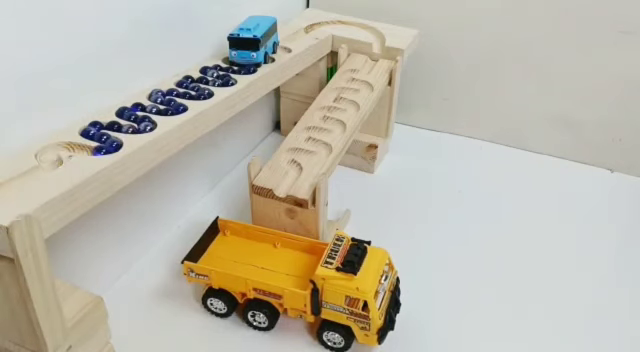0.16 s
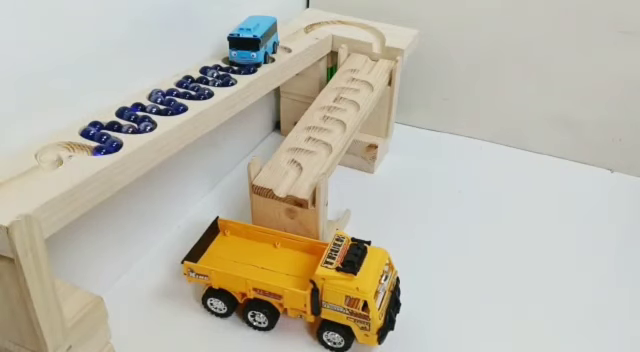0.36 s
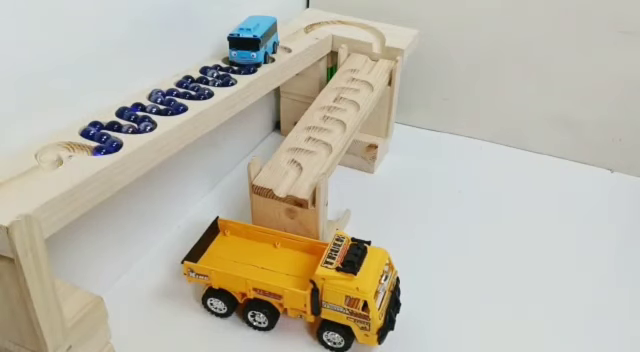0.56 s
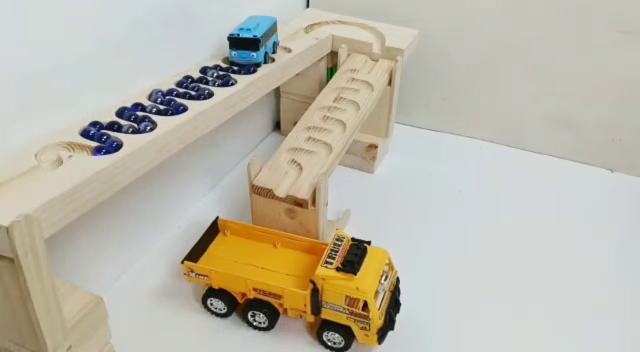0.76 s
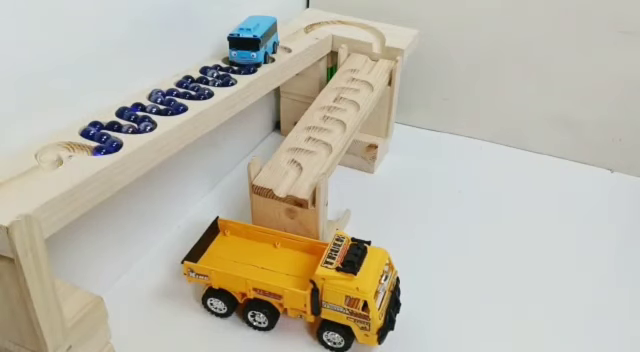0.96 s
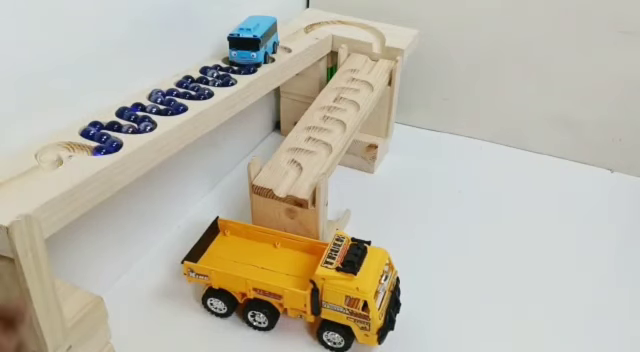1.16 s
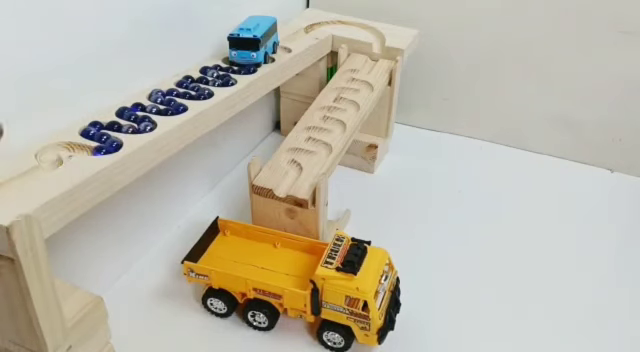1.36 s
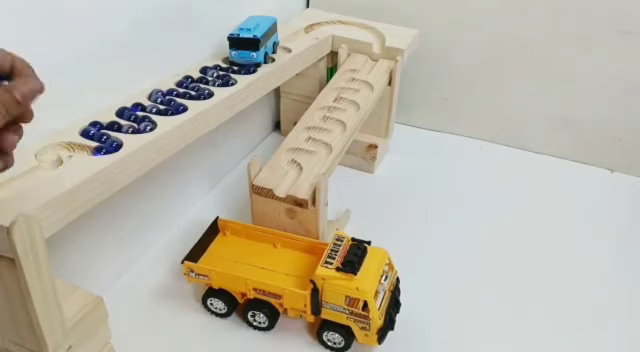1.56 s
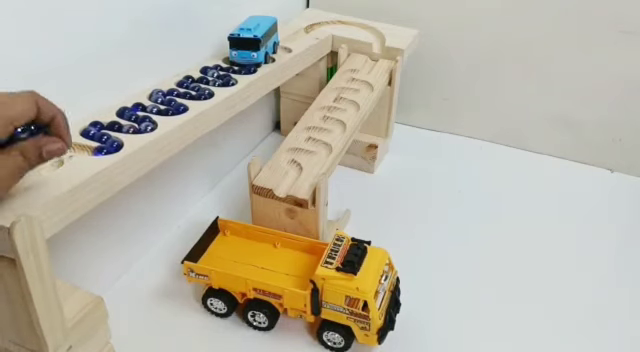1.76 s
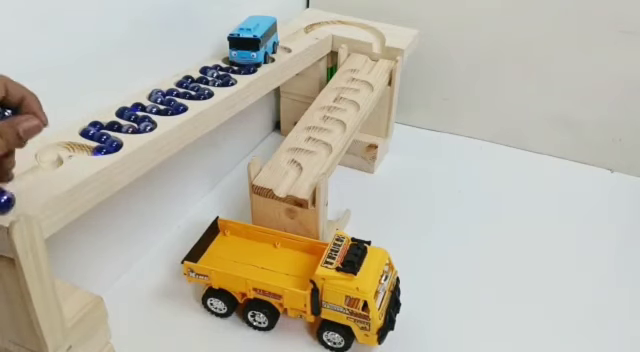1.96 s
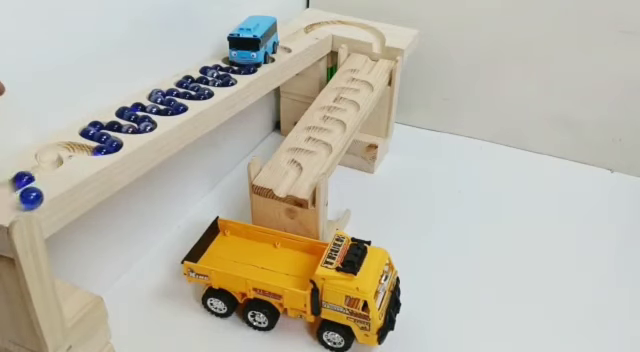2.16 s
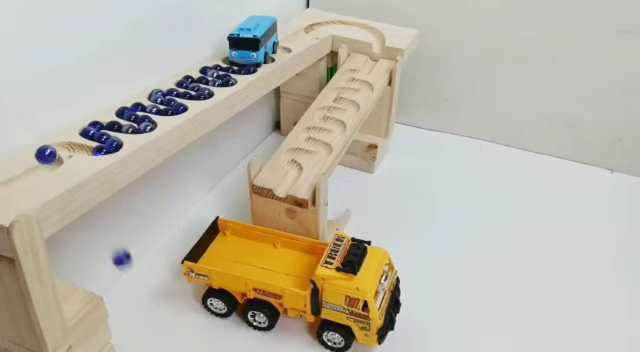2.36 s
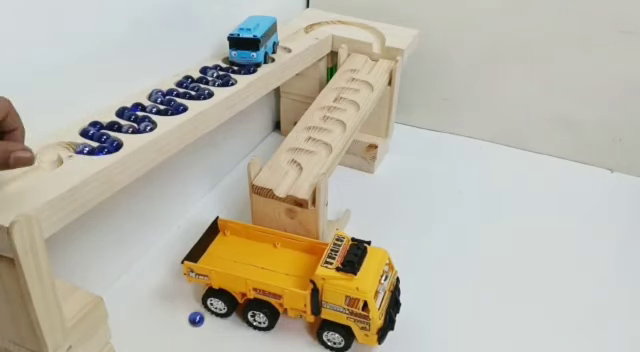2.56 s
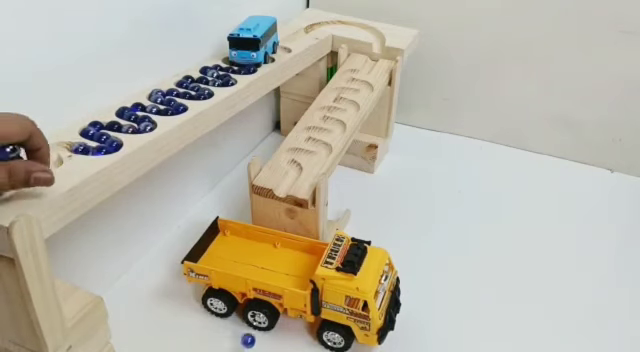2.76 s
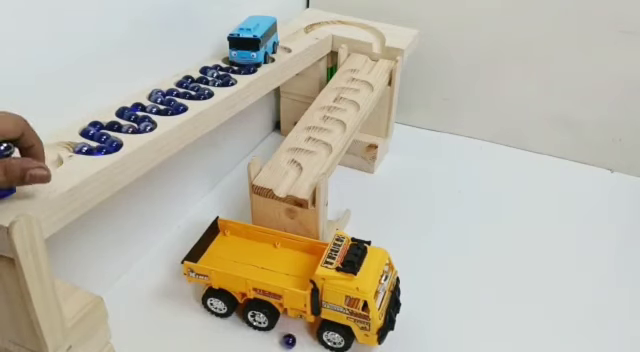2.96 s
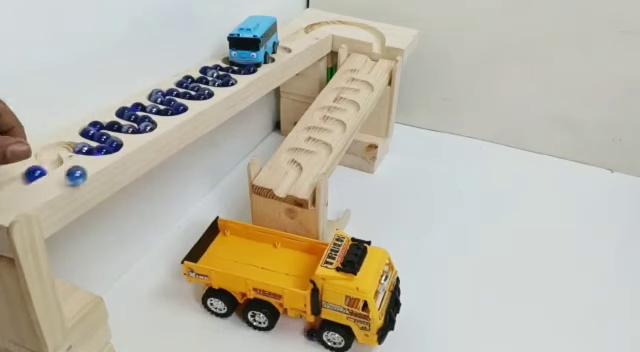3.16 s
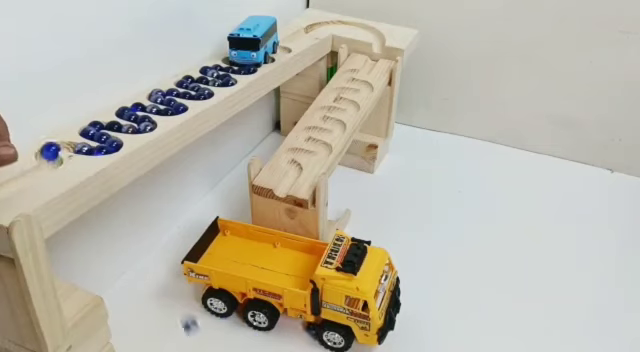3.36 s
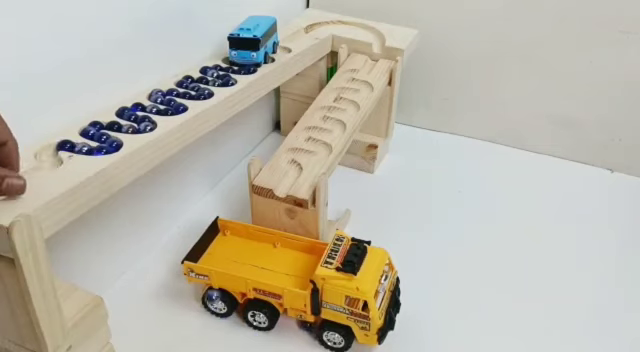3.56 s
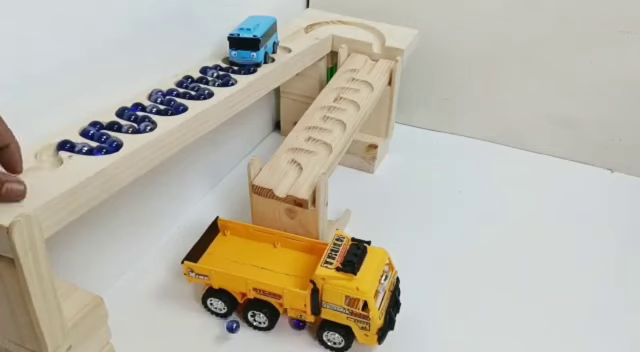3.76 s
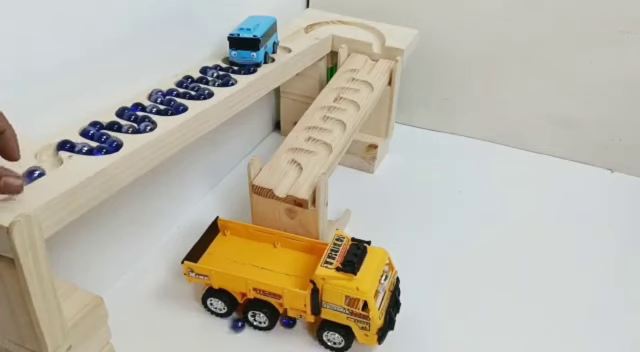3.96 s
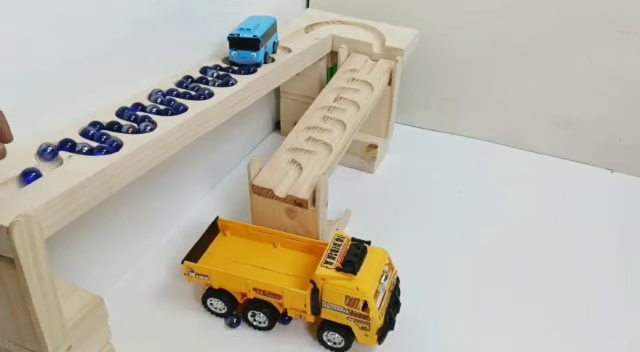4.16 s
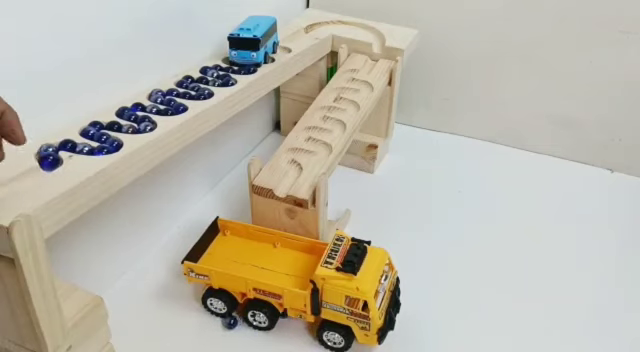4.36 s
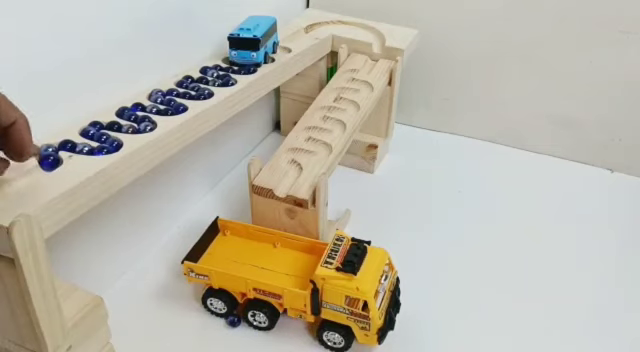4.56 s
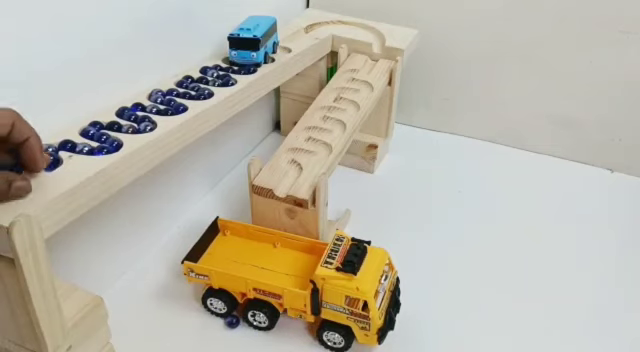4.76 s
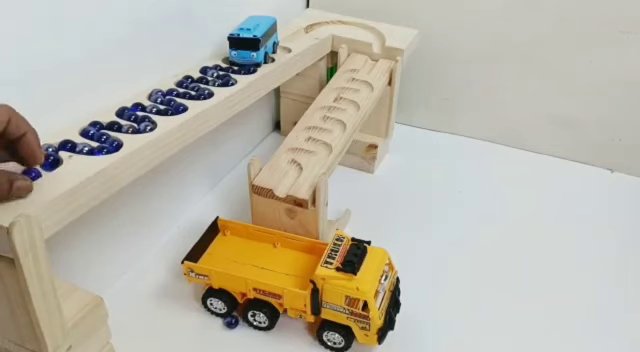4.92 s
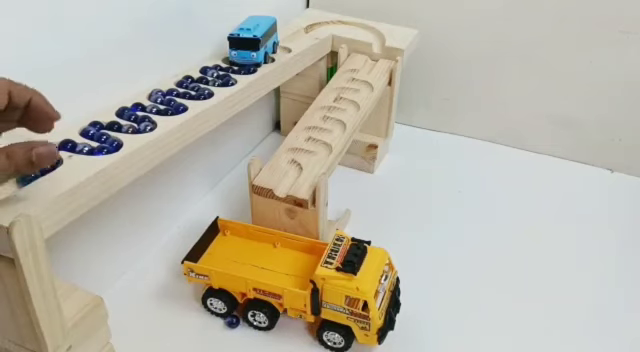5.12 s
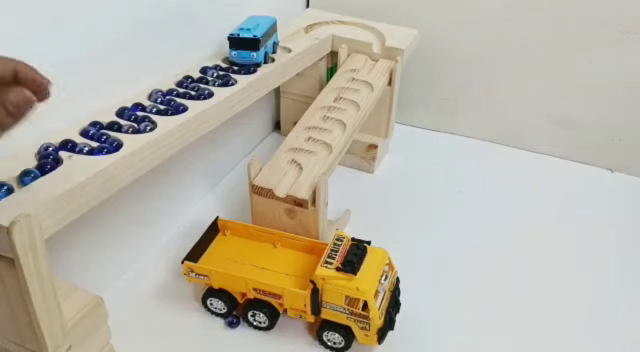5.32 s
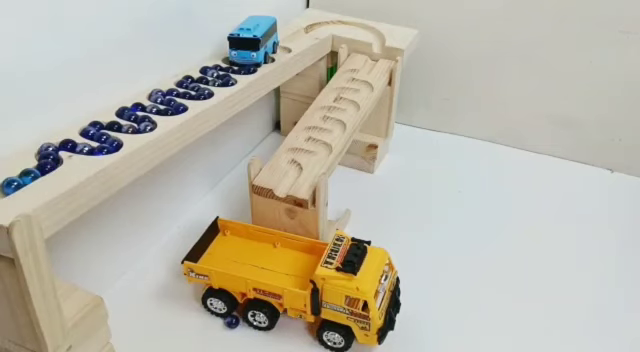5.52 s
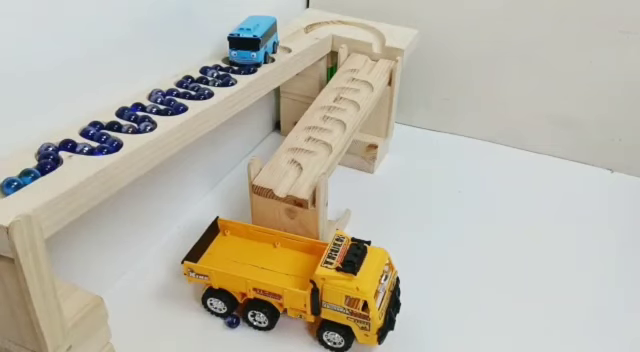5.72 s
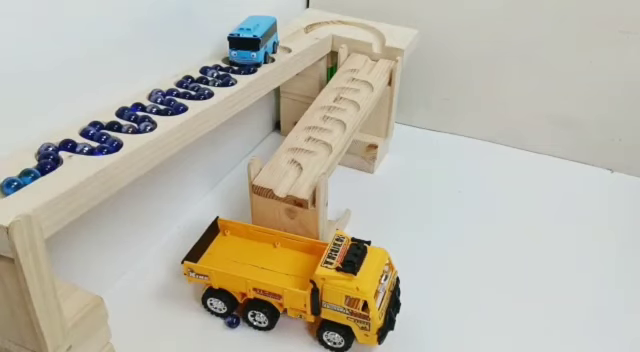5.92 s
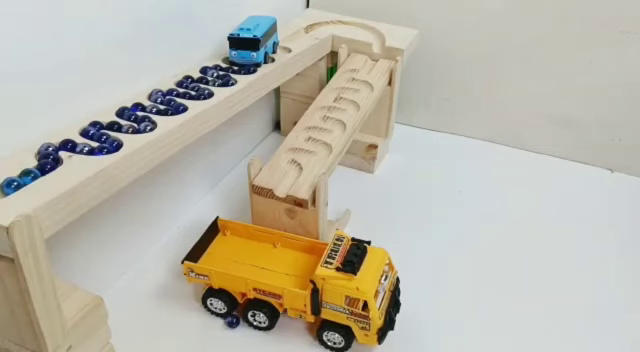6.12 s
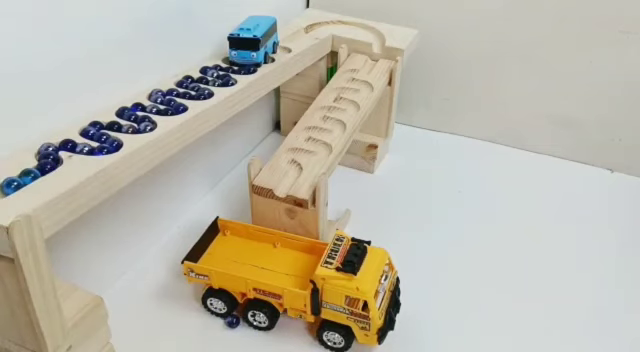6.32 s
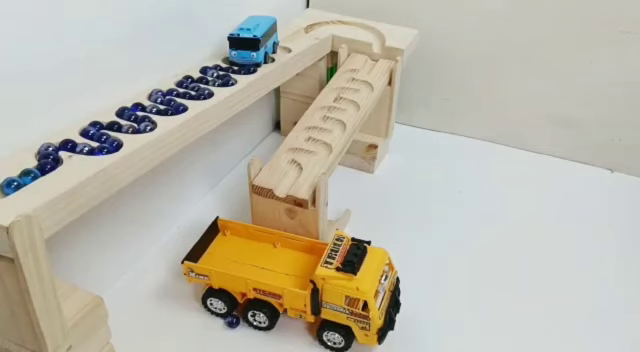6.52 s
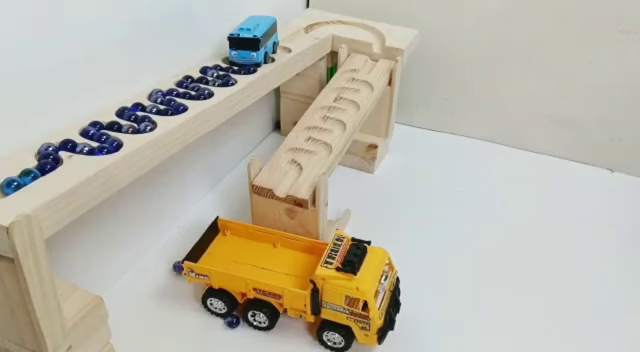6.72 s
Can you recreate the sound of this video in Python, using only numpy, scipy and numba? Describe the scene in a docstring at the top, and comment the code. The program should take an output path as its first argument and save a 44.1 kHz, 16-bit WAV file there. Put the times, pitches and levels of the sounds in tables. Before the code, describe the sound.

A faint wooden ring dies away in a bare, echoing room with soft air murmur. From about 0.3 to 1.5 s a hand stirs glass marbles in a bowl: irregular crunchy rattles, hard clacks near 0.7 s, high glassy pings around 1.1 s. A low boom at 1.8 s leads to clustered woody knocks at 2.0-2.1 s. At 2.7 s a marble hits the hard floor sharply and bounces in quickening, duller clicks. Knocks at 2.9-3.3 s end in a short groove rattle; a second marble drops at 3.65 s and bounces likewise. Knocks return at 3.95 s, a strong one at 4.2 s with chatter and glass clicks. A deep bump thuds at 4.8 s. Softer knocks and bright clinks run from 5.0 to 5.6 s. After a lull, marbles slide softly at 6.1 s, then rattle and clack at 6.4-6.8 s.

```python
"""In a bare, echoing room a plank's ring decays while a hand stirs glass marbles in a bowl: collision noise
excites wandering resonances. From 2 s knocks of glass sound on a wooden track, as contacts exciting plank
modes; marbles rattle along its groove or click together. Near 2.7 s and 3.6 s two fall and bounce on the
hard floor, as sharp pulses with diffuse echoes. From 6.1 s the hand stirs the bowl again.
Dull bumps, a low rumble and a room boom (filtered noise) accompany the handling; air murmurs throughout."""
import sys
import numpy as np
from scipy import signal
from scipy.fft import rfft, irfft
from scipy.io import wavfile
from scipy.ndimage import uniform_filter1d
from numba import njit

SR = 44100
rng = np.random.default_rng(int(sys.argv[2]) if len(sys.argv) > 2 else 0)


def store_wav(level_fs):
    """Save 16-bit WAV to argv[1]."""
    pcm = np.round(np.clip(np.atleast_2d(level_fs), -1, 1) * 32767)
    wavfile.write(sys.argv[1], SR, pcm.T.astype(np.int16))


N = 299439
TIME = np.arange(N) / SR   # s
BURST, ATTACK = 4096, 220   # length of a burst and of its first 5 ms (samples)
CUTOFF_HZ = 15800   # top of the whole sound
# random level changes: scale (dB) and changes a second
CLUMP_DB, CLUMPS_PER_S = 1.8, 90


def from_db(db):
    """Logarithmic level: decibels to amplitude gain."""
    return 10 ** (np.asarray(db) / 20)


def rms_one(x):
    """Normalisation: scale to an rms of 1."""
    return x / np.sqrt(np.mean(x ** 2) + 1e-20)


def in_time(rows):
    """Linear interpolation: the columns of a curve, sample by sample."""
    s, *columns = np.transpose(rows)
    return [np.interp(TIME, s, c) for c in columns]


def at_hz(points, hz):
    """Logarithmic frequency axis: read a curve at the given frequencies."""
    f, value = np.transpose(points)
    return np.interp(np.log(np.maximum(hz, 1)), np.log(f), value)


def cut(x, hz, kind, order=2):
    """Butterworth filtering: a maximally flat pass band."""
    sections = signal.butter(order, np.minimum(hz, SR / 2 - 100), kind, fs=SR, output="sos")
    return signal.sosfilt(sections, x + 1e-18)


def resonate(x, hz, width_hz):
    """Damped resonance: a pole pair whose radius sets the bandwidth, gain 1 on top."""
    r = np.exp(-np.pi * width_hz / SR)
    zeros = np.array([1, 0, -1]) * (1 - r * r) / 2
    poles = [1, -2 * r * np.cos(2 * np.pi * hz / SR), r * r]
    return signal.lfilter(zeros, poles, x + 1e-18)


@njit
def moving_resonance(x, hz, width_hz):
    """Time-varying resonance: a decaying phasor whose pitch and width change from sample to sample."""
    out, state = np.zeros(len(x)), 0j
    for i in range(len(x)):
        state = state * np.exp(np.pi * (2j * hz[i] - width_hz[i]) / SR) + x[i] + 1e-18
        out[i] = state.real
    return out


def drift(per_s, size):
    """Slow random modulation: straight lines between normal values drawn this often."""
    step = SR / per_s
    return np.interp(np.arange(size) / step, np.arange(size), rng.standard_normal(size))


def body(x, modes, spread_db):
    """Modal superposition: every contact excites each resonance with a strength of its own."""
    out = 0
    for k, (hz, width, db) in enumerate(modes):
        struck = x * from_db(db + spread_db * rng.standard_normal(len(x)))
        out = out + (-1) ** k * resonate(struck, hz, width)
    return out


# wandering of a resonance: scale (Hz) and changes a second
WAVER_HZ, WAVER_PER_S = 40, 18


def wavering_body(x, modes, spread_db):
    """Modal superposition with wandering modes: each resonance drifts in pitch as the marbles shift."""
    out = 0
    for hz, width, db in modes:
        struck = x * from_db(db + spread_db * rng.standard_normal(N))
        pitch = hz + WAVER_HZ * drift(WAVER_PER_S, N)
        out = out + 2 * np.pi * width / SR * moving_resonance(struck, pitch, np.full(N, width))
    return out


def pulse(spectrum):
    """Minimum phase: folding the cepstrum gives the most compact causal pulse with this spectrum."""
    cepstrum = irfft(np.log(from_db(at_hz(spectrum, np.fft.rfftfreq(BURST, 1 / SR)))))
    cepstrum[1:BURST // 2] *= 2
    cepstrum[BURST // 2:] = 0
    return irfft(np.exp(rfft(cepstrum)))


def contact(scatter, t60):
    """Impulsive excitation: a click with a decaying noise spray of chatter and near reflections."""
    spray = rng.standard_normal(BURST) * from_db(-60 * np.arange(BURST) / SR / t60)
    return signal.unit_impulse(BURST) + scatter * spray / np.linalg.norm(spray)


def add(out, s, burst, db):
    """Superposition: mix in a burst whose first 5 ms have this rms level."""
    at = int(s * SR)
    out[at:at + BURST] += (burst * from_db(db) / np.sqrt(np.mean(burst[:ATTACK] ** 2)))[:N - at]


def steady(x, window_s):
    """Level equalisation: divide a random sound by its running rms."""
    power = np.abs(uniform_filter1d(x * x, int(window_s * SR)))
    return x / np.sqrt(power + 1e-3 * np.mean(x * x))


def stereo(mid, side, width):
    """Mid-side principle: left and right from a shared and an opposed part."""
    return mid + width * side * np.array([[1], [-1]])


def collisions(per_s, spread_db):
    """Poisson-like process: impulses at random moments, of random size and sign."""
    sizes = from_db(spread_db * np.minimum(rng.exponential(1, N), 3)) * rng.choice([-1, 1], N)
    return sizes * (rng.random(N) < per_s / SR)


def gesture(start, end, attack_s, release_db_per_s, arch_db):
    """Amplitude envelope: linear onset, sine arch in decibels (half of arch_db below 0 at its top), decay."""
    arch = np.sin(np.pi * np.clip((TIME - start) / (end - start), 0, 1))
    onset = np.clip((TIME - start) / attack_s, 0, 1)
    return onset * from_db(arch_db * (arch - 1.5) - release_db_per_s * np.maximum(TIME - end, 0))


# air spectrum: [f/Hz, relative level/dB per Hz]
AIR_SPECTRUM = [(110, -10.5), (404, -7.5), (1050, -7), (1270, -3.5), (1750, -6), (3370, -16), (3800, -29),
                (8610, -25), (16000, -42)]
# air level: [t/s, level/dB]
AIR_LEVEL = [(0, -42), (0.3, -51), (1.9, -45.5), (4.8, -44), (6.79, -49)]


def background():
    """Spectral shaping of noise: white noise becomes the steady murmur of air in the room."""
    white = stereo(*rng.standard_normal((2, N)), width=0.47)
    hiss = irfft(rfft(white) * from_db(at_hz(AIR_SPECTRUM, np.fft.rfftfreq(N, 1 / SR))), N)
    return rms_one(cut(hiss, 82, "high")) * from_db(in_time(AIR_LEVEL)[0])


# reverberation time of the room: [f/Hz, t60/s]
ROOM_T60 = [(150, 1.44), (700, 0.7), (1500, 0.92), (3000, 1.06), (5500, 0.68), (9000, 0.66), (13000, 0.32)]


def room(x, build_s, hold_s, width, treble_db):
    """Diffuse reverberation: dense echoes build up, hold, then decay exponentially band by band."""
    t, edges, tail = TIME[:int(SR * 3 / 2)], np.geomspace(100, 17000, 25), 0
    hz = np.fft.rfftfreq(len(t), 1 / SR)
    white = rfft(stereo(*rng.standard_normal((2, len(t))), width))
    for low, high in zip(edges, edges[1:]):
        centre = np.sqrt(low * high)
        band = irfft(white * ((hz >= low) & (hz < high)), len(t))
        band = band * from_db(CLUMP_DB * drift(CLUMPS_PER_S, len(t)))
        decay_db = 60 * np.maximum(t - hold_s, 0) / at_hz(ROOM_T60, centre)
        tail = tail + band * from_db(treble_db * centre / CUTOFF_HZ - decay_db)
    tail = tail * (1 - np.exp(-t / build_s)) / np.sqrt(SR / 10)
    return signal.fftconvolve(x[None], tail, axes=1)[:, :N]


# resonances of the wooden track: [f/Hz, width/Hz, level/dB]
TRACK = [(424, 39, -11), (836, 150, -11), (1311, 57, 5), (1753, 55, 6), (2160, 130, -9.5), (2680, 250, -7),
         (3390, 290, -9.5), (4280, 1400, -17)]
# ring of an earlier knock: level (dB) and fading (dB a second)
OPENING_RING_DB, OPENING_FADE_DB_PER_S = -40.5, 26


def opening_ring():
    """Exponential decay: noise through the plank's modes, the echo of an earlier knock dying away."""
    ring = cut(body(rng.standard_normal(N), TRACK, spread_db=1.5), 4000, "low", order=4)
    return rms_one(ring) * from_db(OPENING_RING_DB - OPENING_FADE_DB_PER_S * TIME)


# the hand presses and shifts things: [start t/s, end t/s, rumble level/dB, boom level/dB], before the envelope
HANDLING = [(-0.1, 0.33, -43, -42.5), (1.71, 1.856, -47.5, -33.5), (2.252, 2.575, -54, -35.5),
            (3.116, 3.7, -45.5, -37.5), (3.724, 4.178, -43, -62), (4.57, 4.983, -33, -33),
            (4.982, 5.305, -43, -49), (5.714, 6.784, -54.5, -44)]
HANDLING_ATTACK_S, HANDLING_ARCH_DB = 0.085, 4
RUMBLE_RELEASE_DB_PER_S, BOOM_RELEASE_DB_PER_S = 34, 31.5
# what is left of both while the hand rests
RESTING_RUMBLE_DB, RESTING_BOOM_DB = -78, -60
# dull bumps: [t/s, peak level of the envelope/dB, f/Hz]
BUMPS = [(1.793, -28, 170), (3.361, -24, 97), (3.797, -27.5, 84), (3.807, -32.5, 258), (3.878, -28, 74),
         (4.769, -13.5, 115), (4.806, -17.5, 98), (4.877, -27, 115), (6.442, -32, 130)]


def handling():
    """Low-frequency excitation: noise drives a rumble and one room resonance; bumps are short sine pulses."""
    gains = from_db([[RESTING_RUMBLE_DB], [RESTING_BOOM_DB]])
    releases = np.array([[RUMBLE_RELEASE_DB_PER_S], [BOOM_RELEASE_DB_PER_S]])
    for start, end, rumble_db, boom_db in HANDLING:
        press = gesture(start, end, HANDLING_ATTACK_S, releases, HANDLING_ARCH_DB)
        gains = np.maximum(gains, from_db([[rumble_db], [boom_db]]) * press)
    rumble_gain, boom_gain = gains
    white = stereo(*rng.standard_normal((2, N)), width=0.4)
    low_noise = cut(cut(white, 92, "high", order=3), 93, "low", order=3)
    rumble = steady(low_noise, window_s=0.11) * rumble_gain
    room_mode = resonate(resonate(white, 151.0, 15.0), 153.4, 8.8)
    boom = steady(room_mode, window_s=0.068) * boom_gain
    bumps = np.zeros(N)
    for s, db, hz in BUMPS:
        age = np.maximum(TIME - s, 0)
        swell = age / 0.006   # the envelope peaks after 6 ms
        bumps += from_db(db) * swell ** 2 * np.exp(2 - 2 * swell) * np.sin(2 * np.pi * hz * age)
    return rumble + boom + bumps


def bounce_times(s, first_s, shrink, count):
    """Inelastic rebound: each flight lasts a fixed share of the one before."""
    return s + np.append(0, np.cumsum(first_s * shrink ** np.arange(count - 1)))


# falling marbles: [t/s, level/dB, first flight/s, share of speed kept at a bounce, lower lingering ring lift/dB]
FALLS = [(2.6981, -13, .2561, .464, -19), (3.6411, -10.5, .268, .427, -1)]
# successive floor contacts: [level relative to the fall/dB]
FLOOR_CONTACT_DB = [-0.5, 0.5, -1.5, -9.5]
# glass on hard floor: [f/Hz, relative level/dB per Hz]
CLACK_COLOUR = [(280, -32.5), (420, -3.5), (620, -12.5), (900, -3.5), (2400, 3), (4200, -1.5), (6200, -13),
                (8300, -3.5), (10000, -7.5), (12500, -22), (15500, -8)]
# treble lift and room share of the first contact, and what each later one loses; the mix scales the room share
CLACK_TREBLE_DB, DULLER_PER_BOUNCE_DB = 7.5, 13.5
CLACK_ROOM_DB, DRIER_PER_BOUNCE_DB = -1.45, 3


def floor_clacks():
    """Hard impact: one sharp pulse a bounce, ever duller and drier; returns direct sound and room feed."""
    direct, sent = np.zeros(N), np.zeros(N)
    plain = pulse(CLACK_COLOUR)
    treble = cut(plain, 3200, "high", order=1)
    for landing, fall_db, flight_s, kept, _ in FALLS:
        for k, s in enumerate(bounce_times(landing, flight_s, kept, count=len(FLOOR_CONTACT_DB))):
            db = fall_db + FLOOR_CONTACT_DB[k]
            clack = plain + (from_db(CLACK_TREBLE_DB - DULLER_PER_BOUNCE_DB * k) - 1) * treble
            scattered = signal.fftconvolve(contact(scatter=0.85, t60=0.034), clack)[:BURST]
            add(direct, s, scattered, db)
            add(sent, s, clack, db + CLACK_ROOM_DB - DRIER_PER_BOUNCE_DB * k)
    return direct, sent


# two rings after each fall: level relative to the fall (dB), t60 (s), filter width (Hz), pitches (Hz)
LINGER_DB, LINGER_T60_S, LINGER_WIDTH_HZ, LINGER_HZ = -19, 1.18, 1100, (2650, 4400)


def lingering_ring(build_s=0.023):
    """Frequency-selective reverberation: two fluttering noise bands linger after each fall."""
    out = np.zeros((2, N))
    for landing, db, _, _, lift_db in FALLS:
        age = np.maximum(TIME - landing, 0)
        white = stereo(*rng.standard_normal((2, N)), width=0.32)
        for hz, ring_db in zip(LINGER_HZ, (LINGER_DB + lift_db, LINGER_DB)):
            band = rms_one(resonate(resonate(white, hz, LINGER_WIDTH_HZ), hz, 2 * LINGER_WIDTH_HZ))
            flutter_db = CLUMP_DB * drift(CLUMPS_PER_S, N)
            build = 1 - np.exp(-age / build_s)
            out += band * build * from_db(db + ring_db + flutter_db - 60 * age / LINGER_T60_S)
    return out


# envelope shared by groove rolls and stirring
STIR_ATTACK_S, STIR_RELEASE_DB_PER_S, STIR_ARCH_DB = 0.0034, 296, 3.5
# rattling along the groove: [start t/s, end t/s, level before the envelope/dB, top f/Hz]
ROLLS = [(3.266, 3.375, -28, 2470), (4.235, 4.326, -27.5, 5350)]


def groove_rolls():
    """Repeated impact: a marble chatters against the groove's sides in quick, uneven, dry ticks."""
    out = np.zeros(N)
    ticks = cut(collisions(per_s=880, spread_db=-1.5), 1060, "high")
    ticks = cut(ticks, 2600, "low", order=1)
    for start, end, db, top_hz in ROLLS:
        rattle = steady(cut(ticks, top_hz, "low", order=8), window_s=0.04)
        out += from_db(db) * rattle * gesture(start, end, STIR_ATTACK_S, STIR_RELEASE_DB_PER_S, STIR_ARCH_DB)
    return out


# marble against marble: [t/s, level/dB, f/Hz, delay of second click/s, second click relative level/dB]
CLINKS = [(0.193, -28, 8200, 0.06, -5), (3.247, -44.5, 10800, 0.0084, 5.5), (4.351, -36, 7950, 0.017, -7),
          (4.496, -30.5, 7770, 0.026, 4), (5.2221, -33, 7700, 0.027, 5), (5.314, -23.5, 7430, 0.018, -3),
          (5.587, -30, 7770, 0.042, 0)]


def marble_clinks():
    """Momentum transfer: a blow is passed on, so two short contacts each give a bright, grainy chatter."""
    out = np.zeros(N)
    for first, first_db, hz, gap_s, second_db in CLINKS:
        for s, db in ((first, first_db), (first + gap_s, first_db + second_db)):
            hit = contact(scatter=2.8, t60=0.26)
            click = resonate(hit, hz, 1150) + from_db(-35) * cut(hit, 1100, "high")
            add(out, s, click, db)
    return out


# knocks on the track; the one at 2.068 s is a late repeat of the one at 2.058 s:
# [t/s, level before the mix/dB, top of contact spectrum f/Hz, lift of the outer resonances/dB]
KNOCKS = [(2.0358, -22, 3420, 4), (2.058, -19.5, 3600, 0.5), (2.068, -20, 3460, 6.5),
          (2.122, -20.5, 3340, -0.5), (2.9393, -20, 3660, 2.5), (3.030, -20, 3270, 3.5),
          (3.250, -23.5, 2530, -6), (3.324, -28.5, 2550, -2), (3.345, -24.5, 2700, -1),
          (3.9418, -18, 4100, 1), (3.988, -19.5, 3870, 10), (4.224, -12.5, 6030, -1),
          (4.269, -21.5, 4940, 4), (4.326, -26, 4000, -3), (5.011, -23, 3770, 2.5),
          (5.063, -20.5, 4800, -0.5), (5.077, -25.5, 4250, -1.5), (5.3673, -21, 3500, 3),
          (5.3841, -22, 3760, 7), (5.495, -29, 3720, 3.5)]
KNOCK_DETUNE = 0.004   # scale of the random pitch change from knock to knock (share)


def track_knocks():
    """Modal excitation: a soft contact of glass on wood rings the plank, its outer modes more or less."""
    out = np.zeros(N)
    for s, db, top_hz, lift_db in KNOCKS:
        detune = 1 + KNOCK_DETUNE * rng.standard_normal()
        modes = []
        for hz, width, level in TRACK:
            outer = not 1000 < hz < 2000
            modes.append((hz * detune, width, level + lift_db * outer))
        ring = body(contact(scatter=1.58, t60=0.025), modes, spread_db=1)
        add(out, s, cut(ring, top_hz, "low", order=8), db)
    return out


# marbles striking the bowl wall: [t/s, level/dB]
TAPS = [(0.704, -14), (6.378, -43), (6.423, -32), (6.498, -24.5), (6.632, -16.5)]
# wall resonances: [f/Hz, width/Hz, level/dB]
WALL = [(3330, 380, -1), (5810, 160, 2), (8100, 140, -4.5)]


def wall_taps():
    """Modal excitation: a tap rings the wall of the bowl without a crack."""
    out = np.zeros(N)
    for s, db in TAPS:
        add(out, s, body(contact(scatter=0.7, t60=0.04), WALL, spread_db=2), db)
    return out


# softly sliding marbles: [start t/s, end t/s, level/dB, first f/Hz, last f/Hz, overtone level/dB]
SLIDES = [(0.273, 0.377, -38, 1090, 920, 5), (0.346, 0.563, -37.5, 1030, 1040, -1),
          (6.148, 6.28, -36, 896, 840, -10.5)]
# their partials: [multiple of f, level/dB]
SLIDE_PARTIALS = [(1, 6), (2.2, -2), (2.8, 1), (4.12, 3), (5.3, -6)]


def slides(width_hz=55):
    """Friction excitation: tiny slips ring a few partials that glide, swell and fade."""
    out = np.zeros(N)
    for start, end, db, first_hz, last_hz, overtones_db in SLIDES:
        during = (TIME >= start) & (TIME < end)
        slips = collisions(per_s=900, spread_db=3)[during]
        hz = np.linspace(first_hz, last_hz, len(slips))
        ring = 0
        for k, (multiple, level) in enumerate(SLIDE_PARTIALS):
            widths = np.full(len(hz), width_hz * np.sqrt(multiple))
            partial = moving_resonance(slips, hz * multiple, widths)
            ring = ring + from_db(level + overtones_db * (k > 0)) * partial
        out[during] += from_db(db) * np.hanning(len(hz)) ** (1 / 4) * rms_one(ring)
    return cut(out, 610, "high")


# glass on glass: [f/Hz, relative level/dB per Hz]
RATTLE_COLOUR = [(200, -57), (500, -8.5), (750, 9.5), (1400, 0), (2700, 7), (4500, -3), (6800, -15),
                 (9000, 13.5), (10500, 13.5), (14000, -50.5)]


def crack(touches):
    """Convolution: every touch releases the broad crack of glass on glass."""
    return from_db(-9.5) * signal.fftconvolve(touches, pulse(RATTLE_COLOUR))[:len(touches)]


# glassy pitches of single collisions: range (Hz), width (Hz), and gain in a jolt (dB)
OWN_PITCH_HZ, OWN_WIDTH_HZ, OWN_RING_DB = (2184, 10650), 320, 7


def small_contacts():
    """Random excitation of resonators: scattered little clicks ring briefly at one of twenty pitches."""
    clicks = 0
    for hz in np.geomspace(*OWN_PITCH_HZ, num=20):
        clicks = clicks + resonate(collisions(per_s=16, spread_db=0.5), hz, OWN_WIDTH_HZ)
    return rms_one(clicks)


# resonance between hand and bowl as the hand shifts: [t/s, f/Hz, width/Hz]
HOLLOW = [(0.46, 1120, 110), (0.81, 960, 71.6), (1.05, 1095, 240), (1.19, 1190, 403), (1.33, 990, 300),
          (6.2, 805, 70), (6.5, 1110, 160), (6.6, 1000, 150), (6.75, 1140, 200)]


def hollow(touches):
    """Cavity resonance: the air between hand and bowl rings at a pitch that moves with the hand."""
    ring = moving_resonance(touches, *in_time(HOLLOW))
    return cut(cut(ring, 590, "high", order=4), 1720, "low")


# the hand stirs the bowl: [start t/s, end t/s, rattle level before the envelope/dB, ring relative to rattle/dB]
STIRS = [(0.267, 0.465, -37, -50), (0.45, 0.569, -26, -19), (0.64, 0.797, -27.5, -23),
         (0.8, 1.314, -26.5, -5), (1.475, 1.577, -35, -19), (6.102, 6.27, -42, -9),
         (6.476, 6.774, -31.5, -8.5)]
# hollow relative to the rattle (dB), plus its share of the ring's decibels
HOLLOW_DB, HOLLOW_FOLLOWS_RING = 0.5, 0.71


def stirring():
    """Common modulation: one movement of the hand drives the gains of rattle, hollow and glassy ring."""
    gains = np.zeros((3, N))
    for start, end, db, ring_db in STIRS:
        stir = from_db(db) * gesture(start, end, STIR_ATTACK_S, STIR_RELEASE_DB_PER_S, STIR_ARCH_DB)
        shares = from_db([0, HOLLOW_DB + HOLLOW_FOLLOWS_RING * ring_db, ring_db])
        gains = np.maximum(gains, np.outer(shares, stir))
    return gains


# resonances of the heap in the bowl: [f/Hz, width/Hz, level/dB]
BOWL = [(1354, 102, 4.5), (2185, 350, 1.5), (3313, 100, 6), (4330, 440, -5), (5770, 110, -0.5),
        (7950, 110, -2), (9030, 720, -0.5)]
# glassy ring of the marbles: [f/Hz, width/Hz, level/dB]
GLASS_RING = [(11400, 200, -8), (13020, 90, 0), (15250, 170, -7)]


def rummaging():
    """Stochastic excitation: clumps of fine touches drive the heap, with pitched clicks and sharp ticks."""
    rattle_gain, hollow_gain, ring_gain = stirring()
    touches = collisions(per_s=750, spread_db=1.0)
    rattle = steady(crack(touches) + wavering_body(touches, BOWL, spread_db=1.0), window_s=0.06)
    ticks = steady(cut(collisions(per_s=70, spread_db=3), 1500, "high"), window_s=0.15)
    rattle = from_db(-2) * rattle + from_db(-12) * small_contacts() + from_db(-13) * ticks
    air = steady(hollow(touches), window_s=0.051)
    ring = steady(wavering_body(touches, GLASS_RING, spread_db=8.5), window_s=0.051)
    stirred = rattle * rattle_gain + air * hollow_gain + ring * ring_gain
    return stirred * from_db(CLUMP_DB * drift(CLUMPS_PER_S, N))


# collisions that stand out in the bowl: [t/s, level/dB]
JOLTS = [(0.277, -35), (0.346, -29.5), (0.366, -28), (0.472, -21.5), (0.509, -27.5), (0.538, -36),
         (0.564, -28.5), (0.621, -28), (0.635, -25.5), (0.647, -29.5), (0.6616, -22.5), (0.6919, -18),
         (0.701, -16), (0.714, -20), (0.738, -26), (0.819, -28), (0.9952, -19.5), (1.004, -18.5),
         (1.167, -28.5), (1.221, -21.5), (1.255, -29.5), (1.3107, -23.5), (1.332, -25), (1.3745, -25),
         (1.383, -30.5), (1.431, -29.5), (1.491, -29), (1.534, -32), (6.245, -35), (6.473, -32),
         (6.6312, -20)]
# chatter t60 of the lightest jolts, and what the hardest adds (s)
LIGHT_CHATTER_S, HARD_CHATTER_S = 0.009, 0.09
# short glassy pings of glancing touches: [t/s, level/dB, f/Hz]
PINGS = [(0.843, -29, 11500), (0.862, -33, 11100), (0.878, -26.5, 12000), (1.041, -20, 13000),
         (1.063, -21, 13000), (1.097, -24, 12900), (1.1445, -27, 11600), (1.258, -21.5, 12850),
         (6.103, -41.5, 9340), (6.617, -24, 12500), (6.6312, -21, 13200), (6.765, -24, 13200)]
PING_WIDTH_HZ = 260   # of the first filter; the second is twice as wide


def jolts():
    """Impact strength: harder collisions chatter longer as they tick, crack and ring; glancing ones ping."""
    out, hardest_db = np.zeros(N), max(db for _, db in JOLTS)
    tick = from_db(-1.5) * cut(signal.unit_impulse(BURST), 8100, "high")
    for s, db in JOLTS:
        energy = from_db(db - hardest_db) ** 2   # relative to the hardest
        hit = contact(scatter=3.3, t60=LIGHT_CHATTER_S + HARD_CHATTER_S * energy)
        own = from_db(OWN_RING_DB) * resonate(hit, rng.uniform(*OWN_PITCH_HZ), OWN_WIDTH_HZ)
        add(out, s, crack(hit) + body(hit, BOWL, spread_db=3.5) + own + tick, db)
    for s, db, hz in PINGS:
        touch = contact(scatter=1, t60=0.031)
        add(out, s, resonate(resonate(touch, hz, PING_WIDTH_HZ), hz, 2 * PING_WIDTH_HZ), db)
    return out


def scene():
    """Superposition of direct and reverberant sound: contacts sit in the middle and feed the room."""
    knocks, clinks, taps = track_knocks(), marble_clinks(), wall_taps()
    bowl = rummaging() + jolts() + slides()
    clacks, clacks_sent = floor_clacks()
    track_feed = from_db(2.0) * knocks + from_db(4.0) * clacks_sent
    track_echoes = room(track_feed, build_s=0.0018, hold_s=0.03, width=0.34, treble_db=-1.5)
    glass_feed = from_db(-9.5) * clinks + from_db(-4.5) * bowl + from_db(1.5) * taps
    glass_echoes = room(glass_feed, build_s=0.0077, hold_s=0.011, width=0.35, treble_db=-0.5)
    direct = from_db(1.0) * knocks + groove_rolls() + clacks + clinks + bowl + taps
    echoes = track_echoes + glass_echoes + lingering_ring() + opening_ring()
    return direct + echoes + handling() + background()


# spans in which the right channel lags: [start t/s, end t/s]
SLIPS = [(1.98, 3.2), (4.96, 5.14)]
SLIP_S = 0.0124   # the lag


def record(dry):
    """Delay, saturation and band limit: the right channel lags twice, peaks are rounded, the top is cut."""
    lagging = sum(1.0 * ((TIME > a) & (TIME < b)) for a, b in SLIPS)
    slipped = uniform_filter1d(lagging, ATTACK)   # short crossfades
    right = (1 - slipped) * dry[1] + slipped * np.roll(dry[1], round(SLIP_S * SR))
    rounded = 1.1 * np.tanh(np.array([dry[0], right]) / 1.1)
    return signal.sosfilt(signal.ellip(10, 0.2, 80, CUTOFF_HZ, fs=SR, output="sos"), rounded)


dry = scene()
out = record(dry)
store_wav(out)
```